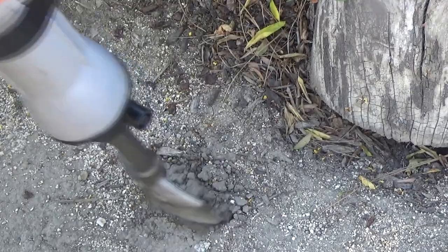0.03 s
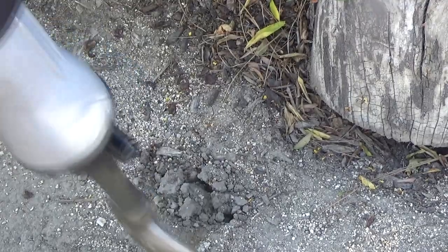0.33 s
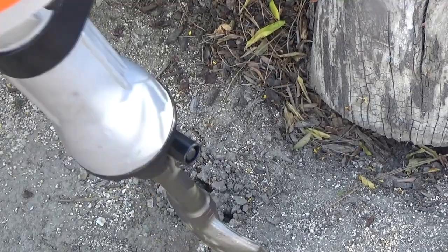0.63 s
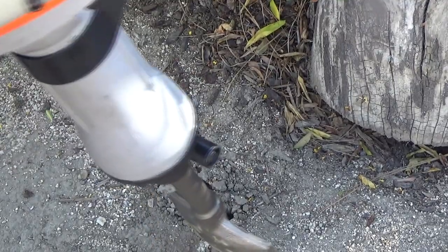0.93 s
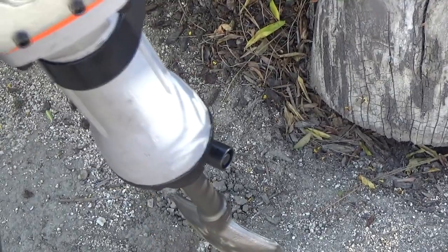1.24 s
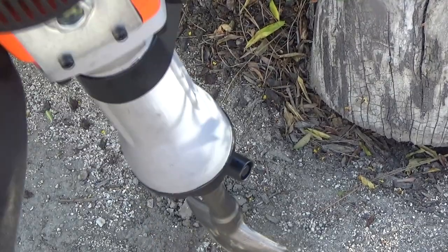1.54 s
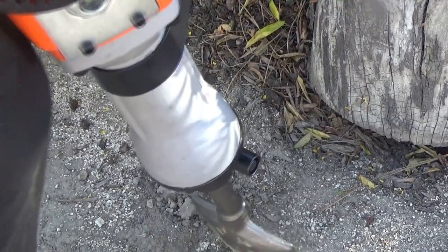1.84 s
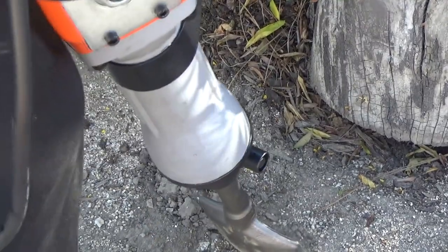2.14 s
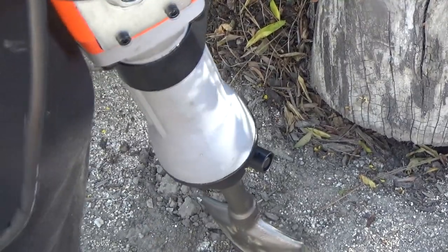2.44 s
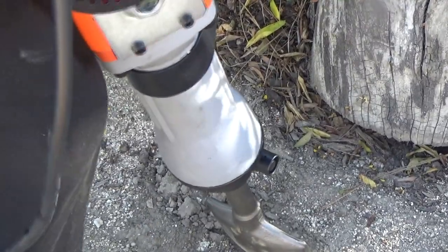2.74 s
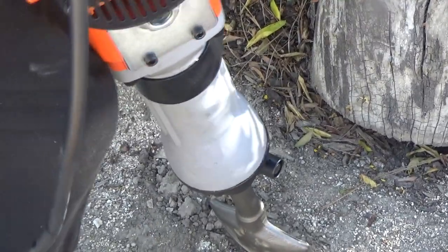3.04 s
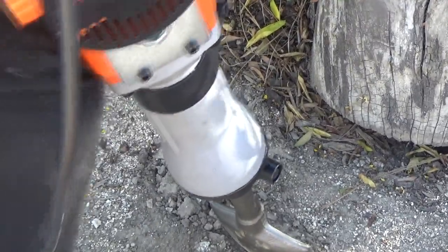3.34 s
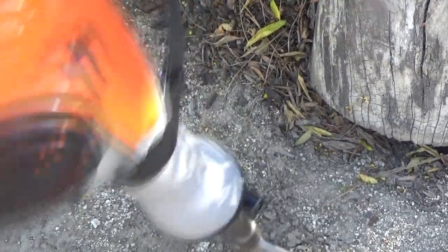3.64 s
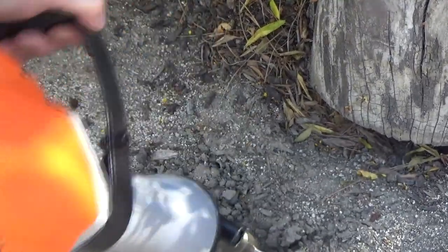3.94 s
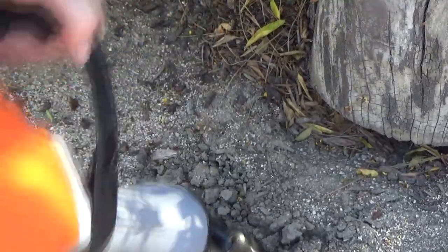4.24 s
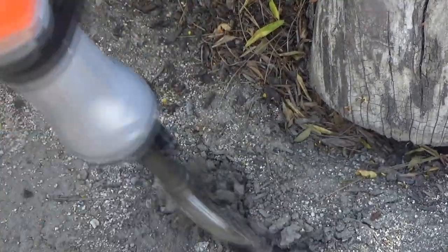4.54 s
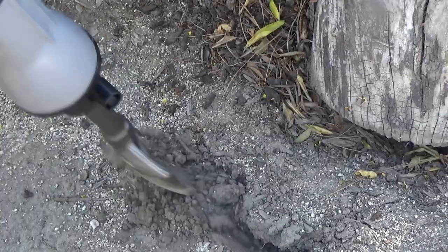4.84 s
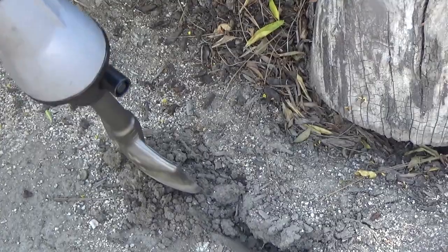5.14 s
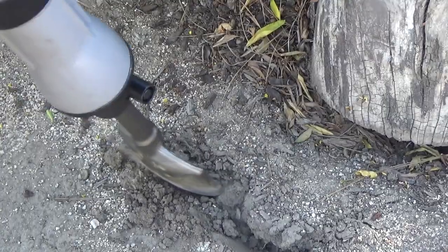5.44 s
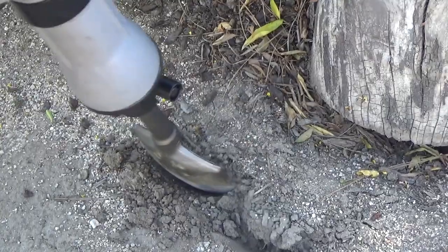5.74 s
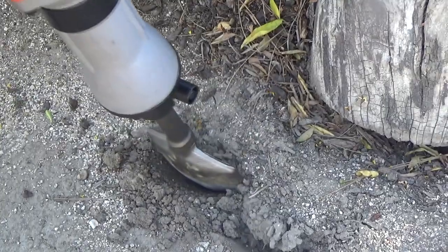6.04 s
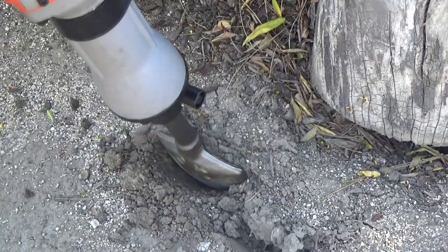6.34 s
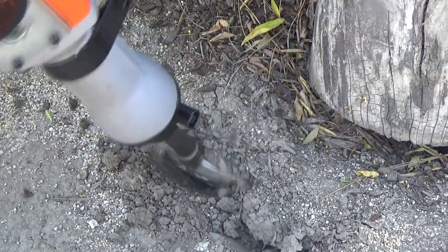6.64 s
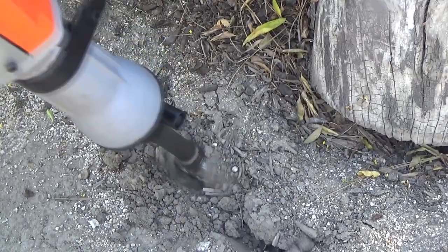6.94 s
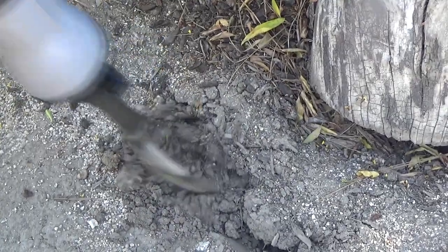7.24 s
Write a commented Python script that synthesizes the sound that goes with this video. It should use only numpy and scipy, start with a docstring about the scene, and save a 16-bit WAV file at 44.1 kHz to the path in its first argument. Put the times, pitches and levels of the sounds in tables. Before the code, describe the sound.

An electric demolition hammer pounds a steel spade into hard soil in two rapid, clattering bursts with a brief pause, close up outdoors.

```python
"""An electric demolition hammer drives a spade into hard, dry soil, outdoors, close to the microphone.
First comes one lone blow and the motor runs down. At 1 s motor and gears clatter up to speed, and from
1.5 s the striker hits the steel once a crank turn: the spade rings, rebounds and thumps the ground.
At 4.4 s the hammering stops, the motor winds down and loosened soil falls. A second burst runs from
5.5 s to 7 s and ends in a rattle. The blows overload the microphone."""
import sys
import numpy as np
from scipy import signal
from scipy.fft import rfft, irfft, next_fast_len
from scipy.io import wavfile

SR = 44100
rng = np.random.default_rng(int(sys.argv[2]) if len(sys.argv) > 2 else 0)


def transcribe(signal):
    """Save signal, clipped to [-1, 1], as a 16-bit WAV file at the path in sys.argv[1]."""
    frames = np.atleast_2d(signal).T
    limited = np.clip(frames, -1, 1)
    pcm = np.round(limited * 32767).astype(np.int16)
    wavfile.write(sys.argv[1], SR, pcm)


N = 326340
TIME = np.arange(N) / SR


def undb(db):
    """Turn decibels into a gain."""
    return 10 ** (np.asarray(db) / 20)


def unit(x):
    """Scale a signal to an average (rms) level of 1."""
    return x / np.sqrt(np.mean(x ** 2))


def fade(t, t60):
    """A dying vibration: it falls by 60 dB in t60 seconds, its ring time."""
    return np.exp(-np.log(1000) * t / t60)


def follow(table, times):
    """Join a table's rows with straight lines and read each column at the given times."""
    seconds, *columns = np.transpose(table)
    return [np.interp(times, seconds, column) for column in columns]


def walk(per_s):
    """A random curve that wanders around zero, by roughly 1 either way."""
    knots = rng.standard_normal(2048)
    return np.interp(TIME * per_s, np.arange(len(knots)), knots)


def colour(x, spectrum, peaks=()):
    """Give a sound a tone colour and resonances; white noise keeps its overall level."""
    size = next_fast_len(N + 8192, real=True)
    hz = np.maximum(np.arange(size // 2 + 1) * SR / size, 1)
    point_hz, point_db = np.transpose(spectrum)
    db = np.interp(np.log(hz), np.log(point_hz), point_db)
    db += sum(lift / (1 + (2 * (hz - centre) / width) ** 2) for centre, width, lift in peaks)
    # make the filter ring only after a hit, never before it
    cepstrum = irfft(np.log(unit(undb(db))), size)
    cepstrum[1:size // 2] *= 2
    cepstrum[size // 2 + 1:] = 0
    return irfft(rfft(x, size) * np.exp(rfft(cepstrum)), size)[:N]


def cut(x, order, hz, keep):
    """Keep the "low" or the "high" side of a frequency."""
    return signal.sosfilt(signal.butter(order, hz, keep, fs=SR, output="sos"), x)


def place(times, sounds):
    """Lay one short sound at each time."""
    out = np.zeros(N + SR)
    for t, sound in zip(times, sounds):
        i = max(int(round(t * SR)), 0)
        out[i:i + len(sound)] += sound
    return out[:N]


def hits(times, db, t60, alike=0, size=6000):
    """A puff of fading noise for each hit; `alike` (0 to 1) is how much it resembles the one before."""
    noise = rng.standard_normal((len(times), size))
    for k in range(1, len(times)):
        noise[k] = alike * noise[k - 1] + np.sqrt(1 - alike ** 2) * noise[k]
    return place(times, undb(db)[:, None] * noise * fade(TIME[:size], t60))


# Tone colour of the open air. Each row: frequency in Hz, relative level in dB.
AIR_COLOUR = [(20, 2), (55, 5), (130, -2.5), (300, -7.5), (700, -17), (1050, 0.5), (2000, -25.5),
              (3800, -33), (8000, -37), (15000, -67)]


def air(level_db=-62.5):
    """A faint outdoor background that slowly swells and sinks."""
    return undb(level_db + 0.46 * walk(2.71)) * colour(rng.standard_normal(N), AIR_COLOUR)


# Clods land and the spade scrapes. Each row: start in seconds, relative crunch and thud levels in dB.
FALLING_CLODS = [(4.612, -40.5, -71), (4.67, -47, -72), (4.733, -37, -70.5), (4.963, -33, -54),
                 (4.979, -36, -49), (4.994, -29.5, -33.5), (5.023, -32.5, -51), (5.038, -37.5, -47),
                 (7.356, -33, -38.5)]
# Fine soil trickling down. Each row: time in seconds, level in dB.
TRICKLE_LEVEL = [(4.6, -82), (4.9, -66), (5.08, -56), (5.4, -55.5), (5.5, -67)]
# Tone colours of crunch, thud and trickle. Each row: frequency in Hz, relative level in dB.
CRUNCH_COLOUR = [(100, -49), (800, -7.5), (2400, 8), (4000, -3.5), (8000, -15), (15000, -56)]
THUD_COLOUR = [(40, -26), (200, -5), (450, 1), (900, 1), (3000, -41)]
TRICKLE_COLOUR = [(120, -0.5), (330, 11), (800, 4.5), (1800, -6), (3500, -17.5), (4800, -1.5), (7500, -6.5),
                  (10000, -12), (15000, -27)]


def soil():
    """Clods crunch and thud down, and fine grains trickle after them."""
    times, crunch_db, thud_db = np.transpose(FALLING_CLODS)
    crunch = colour(hits(times, crunch_db - 7.5, t60=0.068) * undb(1.8 * walk(250)), CRUNCH_COLOUR)
    thud = colour(hits(times, thud_db - 2, t60=0.07), THUD_COLOUR)
    trickle = undb(follow(TRICKLE_LEVEL, TIME)[0]) * colour(rng.standard_normal(N), TRICKLE_COLOUR)
    return crunch + thud + trickle


def stone_ting(start_s=4.583, hz=4990, db=-70, t60=.9, attack_s=0.027):
    """A stone brushes the lifted spade and leaves one thin, fading tone."""
    t = TIME[:SR]
    envelope = undb(db) * fade(t, t60) * (1 - np.exp(-t / attack_s))
    return place([start_s], [envelope * np.sin(2 * np.pi * hz * t)])


# Crank speed while hammering, one list for each burst. Each row: time in seconds, turns per second.
HAMMERING_SPEED = [
    [(1.509, 26.15), (1.57, 22.01), (1.8, 21.05), (3.6, 20.94), (3.74, 21.53), (3.84, 20.92), (4.11, 12.09),
     (4.39, 4.64)],
    [(5.495, 11.39), (5.67, 18.52), (5.82, 20.17), (6.03, 21.21), (6.89, 21.17), (7.07, 13.96)],
]


def blow_times(lone_blow_s=.0332):
    """After one lone blow, the striker lands at the start of each burst and after each full turn."""
    times = [[lone_blow_s]]
    for burst in HAMMERING_SPEED:
        t = TIME[(TIME >= burst[0][0]) & (TIME <= burst[-1][0])]
        turns = np.cumsum(follow(burst, t)[0]) / SR
        times.append(np.interp(np.arange(turns[-1]), turns, t))
    return np.concatenate(times)


def crank():
    """How far the crank is through its turn (0 at a blow), and whether the striker is working."""
    times = blow_times()
    turn = np.clip(np.searchsorted(times, TIME) - 1, 0, len(times) - 2)
    period = np.diff(times)[turn]
    phase = (TIME - times[turn]) / period
    return phase % 1, (period < .2) & (phase < 1)


FULL_SPEED, WEAK_SPEED = 21, 10.4  # turns per second; below the second, blows lose force
# Crank speed outside the bursts. Each row: time in seconds, turns per second.
IDLE_SPEED = [(0, 18.8), (.35, 11.7), (.66, 7), (.8, 3.7), (1.02, 2.1), (1.15, 21.5), (4.42, 8.7),
              (4.49, 5), (4.53, 2), (4.85, .5), (5.4, 0.55), (7.4, 10.4)]


def speed(times):
    """Crank turns per second, hammering or not."""
    rows = sorted(map(tuple, np.vstack([IDLE_SPEED, *HAMMERING_SPEED])))
    return np.maximum(follow(rows, times)[0], .1)


# Pulls of the trigger. Each row: start, time to reach full power and release, all in seconds.
TRIGGER_PULLS = [(1.034, .004, 3.79), (5.414, 0.1, 6.86)]
# How hard the powered motor works. Each row: time in seconds, extra level in dB.
MOTOR_EFFORT = [(1.04, 4.5), (1.11, -3), (1.27, 4.5), (1.7, 0.5), (2.5, 0), (3.05, -2), (3.5, -2),
                (3.85, 4), (5.45, 2.5), (5.7, -2.5), (5.87, 1), (6.4, 2.5), (6.82, -1.5)]


def motor_gain(power_db, coast_db, halving_db, release_s=0.25):
    """A motor noise follows the effort under power; coasting, it loses halving_db as the speed halves."""
    power = sum(np.clip((TIME - on) / attack, 0, 1) * np.clip(1 - (TIME - off) / release_s, 0, 1)
                for on, attack, off in TRIGGER_PULLS)
    driven = undb(power_db + follow(MOTOR_EFFORT, TIME)[0])
    coasting = undb(coast_db + halving_db * np.log2(speed(TIME) / FULL_SPEED))
    return power * driven + (1 - power) * coasting


def wavering(hz, waver, per_s, flutter_db=4):
    """A tone whose pitch wavers and whose level flutters."""
    phase = 2 * np.pi * np.cumsum(hz * (1 + waver * walk(per_s))) / SR
    return undb(flutter_db * walk(per_s)) * np.sin(phase)


# The slowing motor sings briefly. Each row: start and length in seconds, first and last pitch in Hz,
# level in dB, waver as a share of the pitch.
MOTOR_SIGHS = [(4.42, .42, 2520, 2146, -63, 0.033), (7.138, 0.12, 810, 797, -44.5, 0.0066)]


def coasting_whirr(rest_hz=2590):
    """With no load the gears whirr, and a thin motor tone falls after each burst."""
    idle = ~crank()[1] | (speed(TIME) < WEAK_SPEED)
    gain = idle * motor_gain(power_db=-66, coast_db=-38, halving_db=9.5)
    out = gain * wavering(rest_hz + 5 * speed(TIME), waver=0.015, per_s=150)
    for start, length, start_hz, end_hz, db, waver in MOTOR_SIGHS:
        progress = np.clip((TIME - start) / length, 0, 1)
        tone = wavering(start_hz + (end_hz - start_hz) * progress, waver, per_s=180)
        out += undb(db) * np.sin(np.pi * progress) ** 2 * tone
    return out


# Tone colour of the fan. Each row: frequency in Hz, relative level in dB.
FAN_COLOUR = [(40, -21.5), (170, -6.5), (290, -11.5), (440, -2), (600, -1.5), (820, 4), (1000, -1),
              (1180, -3), (1500, 1), (3000, -34.5)]


def fan():
    """The motor's fan makes an uneven rush of air."""
    rush = undb(3.3 * walk(40)) * colour(rng.standard_normal(N), FAN_COLOUR)
    return motor_gain(power_db=-46, coast_db=-47.5, halving_db=3.2) * rush


def gear_whine(phase, hz=3150, sag=.16):
    """Meshing teeth whine; before each blow the tone swells and sags as compression brakes the motor."""
    brake = np.interp(phase, [0, .3, .78, 1], [1, .7, 0, 1])
    swell = np.interp(phase, [0, .15, .6, .8, 1], [1, .3, .3, 1, .9])
    mesh = 2 * np.pi * np.cumsum(hz * (1 - sag * brake + 0.01254 * walk(120))) / SR
    return swell * undb(-2 + 2 * walk(90)) * np.sin(mesh)


# Tone colour of clattering metal. Each row: frequency in Hz, relative level in dB.
CLATTER_COLOUR = [(100, -27.5), (700, -16), (1200, -7), (1650, 3.5), (2300, 0.5), (3200, -1.5),
                  (4200, -11.5), (6000, -14), (9000, -26.5), (11000, -31.5), (15500, -47)]
# Resonances of the gear case. Each row: frequency in Hz, width in Hz, boost in dB.
CASE_RESONANCES = [(1513, 30, 8), (2689, 186, 10), (3030, 48, 1), (4090, 140, 3.5), (6100, 160, 2),
                   (7520, 220, 12.5), (8220, 320, 8), (9470, 300, 8), (11800, 400, 1)]


def gears(rough_db=3, slaps_per_s=170, slap_s=0.0014, split_hz=4500, idle_throb_db=1.5):
    """Gear teeth clatter in the case, hardest while the piston compresses its air cushion."""
    phase, working = crank()
    working_db = np.interp(phase, [0, .25, .5, .63, .88, 1], [-11.5, 4.5, -3, 4.5, 3.5, 5])
    idle_db = idle_throb_db * np.sin(2 * np.pi * np.cumsum(speed(TIME)) / SR)  # one throb a turn
    load = undb(np.where(working, working_db, idle_db))
    # loose teeth slap at random; under load they stay pressed together and slap more softly
    slaps = (rng.random(N) < slaps_per_s / SR) * rng.exponential(size=N) * np.where(working, .3, 1)
    slaps = signal.lfilter([1], [1, -np.exp(-1 / (slap_s * SR))], slaps)
    teeth = rng.standard_normal(N) * np.sqrt(1 + 7 * slaps) * undb(rough_db * rng.standard_normal(N))
    clatter = colour(unit(teeth), CLATTER_COLOUR, CASE_RESONANCES)
    middle = undb(-1.24) * unit(cut(clatter, 3, split_hz, "low")) + working * gear_whine(phase)
    hiss = unit(cut(clatter, 3, split_hz, "high"))
    middle *= motor_gain(power_db=-34.5, coast_db=-37.5, halving_db=6.33)
    hiss *= motor_gain(power_db=-42, coast_db=-38.5, halving_db=14)
    return load * (middle + hiss)


# Single knocks of the crank and tool holder. Each row: start in seconds, relative level in dB.
SINGLE_KNOCKS = [(0.1368, -15.5), (0.6774, -25.5), (0.825, -34.5), (0.872, -31), (1.032, -20.5),
                 (1.314, -16), (4.2754, -22.5), (4.29, -28), (4.3296, -25.5), (4.4156, -26),
                 (5.3737, -37.5)]
# The idle striker rattles evenly. Each row: start and end in seconds, knocks per second,
# first and last relative level in dB.
STRIKER_RATTLES = [(0.08, .4, 18.3, -27, -23.5), (1.158, 1.48, 17, -16.5, -16), (7.135, 7.36, 18, -20, -26)]


def knocks():
    """Loose parts knock in the gear case while the striker idles or slows."""
    rows = list(SINGLE_KNOCKS)
    for start, end, per_s, first_db, last_db in STRIKER_RATTLES:
        times = np.arange(start, end, 1 / per_s)
        rows += zip(times, np.linspace(first_db, last_db, len(times)))
    times, db = np.transpose(rows)
    jolts = hits(times, db - 10, t60=0.029) + hits(times, db - 12.5, t60=0.079)
    return colour(jolts, CLATTER_COLOUR, CASE_RESONANCES)


def ground_thump(times, soft_ms, firm_hz=105, firm_db=-35):
    """The ground is a heavily damped spring under the spade; softer soil thumps lower and weaker."""
    t = TIME[:SR // 8]
    hz, db = firm_hz - 2.4 * soft_ms, firm_db - 5 * soft_ms
    swing = 2 * np.pi * hz[:, None] * t
    main_tone = np.sin(swing) * fade(t, 0.072)
    overtone = undb(-1.5) * np.sin(1.9 * swing) * fade(t, 0.024)
    return place(times, undb(db)[:, None] * (main_tone + overtone))


# Low tones of the tool's body on firm ground. Each row: pitch in Hz, relative level in dB,
# ring time in seconds.
BODY_TONES = [(263, -4.5, 0.012), (488, -3, 0.034), (670, -13.5, 0.026), (880, -4, 0.04)]


def body_knock(times, db, soft_ms):
    """The heavy body of the tool answers each jolt with a short knock, lower on soft ground."""
    hz, tone_db, t60 = np.transpose(BODY_TONES)[:, :, None]
    t = TIME[:SR // 10]
    envelope = undb(tone_db) * fade(t, t60)
    sounds = [undb(level) * np.sum(envelope * np.sin(2 * np.pi * hz * pitch * t), axis=0)
              for level, pitch in zip(db, 1 - 0.019 * soft_ms)]
    return place(times, sounds)


# Tones of the steel spade. Each row: pitch in Hz, relative level in dB, free ring time in seconds.
SPADE_TONES = [(1543, -3.5, 0.033), (3540, -5.5, 0.076), (4197, 15.5, 0.016), (5825, 2.5, 0.067),
               (5890, -5.5, 0.06), (6190, -9.5, 0.084), (8380, -6, 0.057), (9040, -13.5, 0.12),
               (9150, -11, 0.066), (11750, -15.5, 0.065)]


def spade_ring(times, db, grip=0.51, scatter_db=2.2, detune=.0015, attack_s=0.0032):
    """The steel rings a little differently after each blow; mid-burst the soil's grip cuts it short."""
    hz, tone_db, t60 = np.transpose(SPADE_TONES)[:, :, None]
    t = TIME[:8000]
    ring_shares = np.where(np.diff(times, append=np.inf) < .2, grip, 1)
    rings = []
    for level, share in zip(db, ring_shares):
        level_chance, pitch_chance = rng.standard_normal((2, len(SPADE_TONES), 1))
        envelope = fade(t, t60 * share) * (1 - np.exp(-t / attack_s))
        tones = np.sin(2 * np.pi * hz * (1 + detune * pitch_chance) * t)
        rings.append(np.sum(undb(level + tone_db + scatter_db * level_chance) * envelope * tones, axis=0))
    return place(times, rings)


# How the spade sits in the soil, one list for the lone blow and one for each burst. Each row: time in
# seconds, relative blow level in dB, rebound delay in milliseconds, relative ring level in dB,
# extra level of the hollow bark in dB.
SPADE_SEATING = [
    [(0, -22.5, 8.1, -31, 0.5)],
    [(1.51, -24, 14, -22, 2.5), (1.58, -17.5, 13.6, -18.5, -2), (1.72, -23, 11.8, -23, -0.5),
     (2.1, -21, 8.3, -17.5, -3), (2.5, -22, 7.14, -24, -3.5), (3.1, -24, 7, -20.5, -7.5),
     (3.55, -23, 5.3, -28, -8.5), (3.82, -23.5, 5.5, -26, 0), (4.02, -22.5, 8.2, -27.5, 4),
     (4.13, -20, 17, -29, -0.5), (4.37, -19.5, 21, -44, 4.5)],
    [(5.5, -19.5, 15.8, -18, -8), (5.68, -21.5, 11.6, -30.5, -6), (6.05, -22, 10.5, -25.5, -21),
     (6.3, -21.5, 10.1, -20, -30), (6.65, -23.5, 8.8, -24, -15), (6.88, -23.5, 10.2, -23.5, -7.5),
     (7.05, -24.5, 10.3, -32.5, 1)],
]
# Tone colours of sharp crack, hollow bark and dull rebound. Each row: frequency in Hz, relative dB.
CRACK_COLOUR = [(60, -45), (250, -10.5), (600, -12), (1150, -10), (1750, 2), (2250, -3.5), (2700, 5),
                (3500, -1.5), (4800, -5), (6800, -8.5), (8500, -8.5), (10500, -14.5), (15500, -24)]
BARK_COLOUR = [(200, -19), (550, -7.5), (900, 0), (1300, 2.5), (1750, 0.5), (2200, -15), (5000, -48.5)]
REBOUND_COLOUR = [(30, -12.5), (65, -0.5), (200, -11), (460, 0.5), (600, 1), (850, 1), (1500, -4.5),
                  (3000, -9.5), (6000, -10.5), (15000, -25.5)]


def hammer_blows(scatter_db=0.86, firm_ms=7):
    """Each blow cracks through the housing, rings the spade, thumps the ground and rebounds more dully."""
    times = blow_times()
    db, delay_ms, ring_db, bark_db = follow(np.vstack(SPADE_SEATING), times)
    weak_db = 2 * np.maximum(WEAK_SPEED - speed(times), 0)  # a slow crank throws the striker weakly
    force_db = scatter_db * rng.standard_normal(len(times)) - weak_db
    db = db + force_db
    back = times + delay_ms / 1000
    soft_ms = np.maximum(delay_ms - firm_ms, 0)  # soft ground returns the spade later
    held = np.diff(times, append=np.inf) < .055  # the spade is held fast when blows come quickly
    rebound_db = db + np.where(held, 2.5, -6.5)
    crack = hits(times, db + 8.5, t60=0.024, alike=0.872) + hits(times, db - 4.5, t60=0.093, alike=0.53)
    # a loosely held spade bounces back against its holder, steel on steel
    crack += hits(back[~held], rebound_db[~held] + 6.5, t60=0.024)
    bark = colour(hits(times, db + bark_db + 6, t60=0.021, alike=0.61), BARK_COLOUR)
    rebound = colour(hits(back, rebound_db - 7, t60=0.026, alike=0.962), REBOUND_COLOUR)
    ring = spade_ring(times, ring_db + force_db + 4.5)
    knock = body_knock(times, rebound_db - 15.5, soft_ms) + body_knock(back, rebound_db - 11, soft_ms)
    # the thump and the body knock carry no deep bass below about 60 Hz
    thump = cut(ground_thump(back - .0015, soft_ms) + knock, 4, 62, "high")
    return colour(crack, CRACK_COLOUR) + bark + rebound + ring + thump


def scene():
    """Everything at one microphone in the open."""
    tool = hammer_blows() + gears() + fan() + coasting_whirr() + knocks()
    return (tool + stone_ting() + soil() + air())[None]


def record(dry, overload=.155, bass_hz=48, top_hz=15500):
    """The microphone flattens the peaks of the blows; deep bass and the highest treble are cut."""
    flattened = dry / (1 + (dry / overload) ** 4) ** (1 / 4)
    thinned = cut(flattened, 2, bass_hz, "high")
    return signal.sosfilt(signal.ellip(8, .2, 70, top_hz, fs=SR, output="sos"), thinned)


dry = scene()
out = record(dry)
transcribe(out)
```